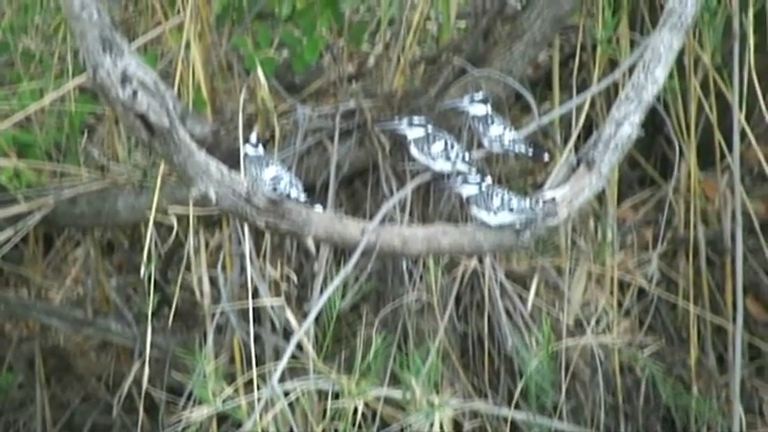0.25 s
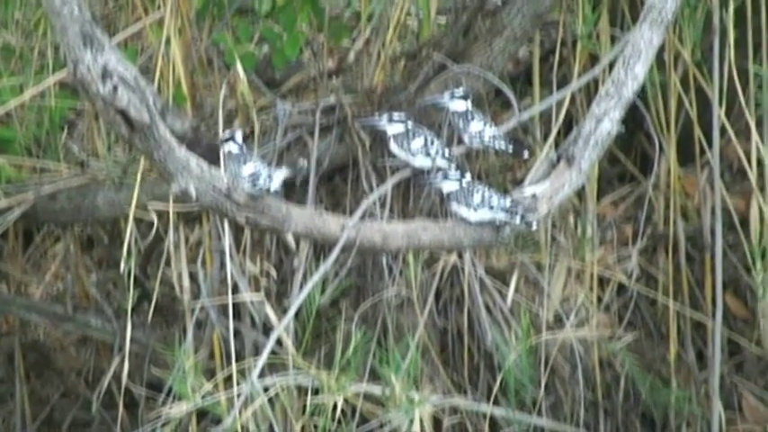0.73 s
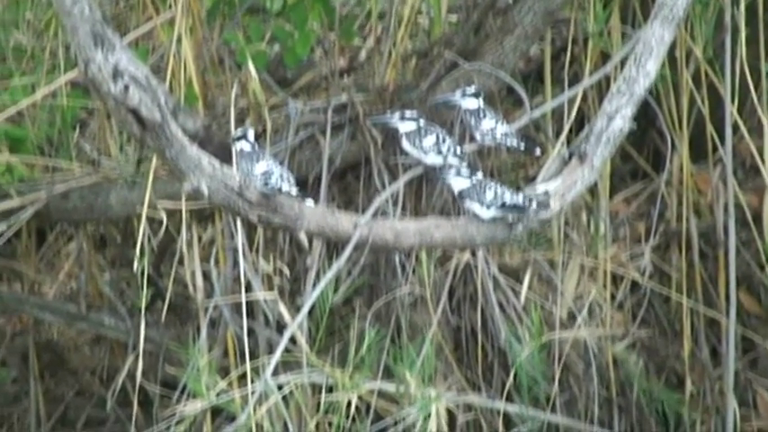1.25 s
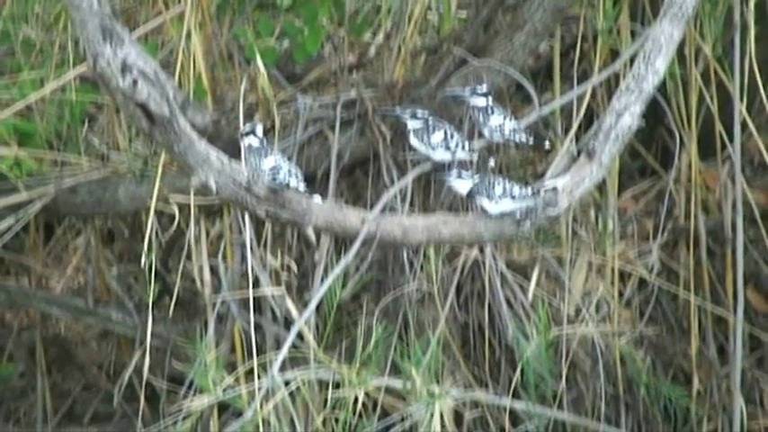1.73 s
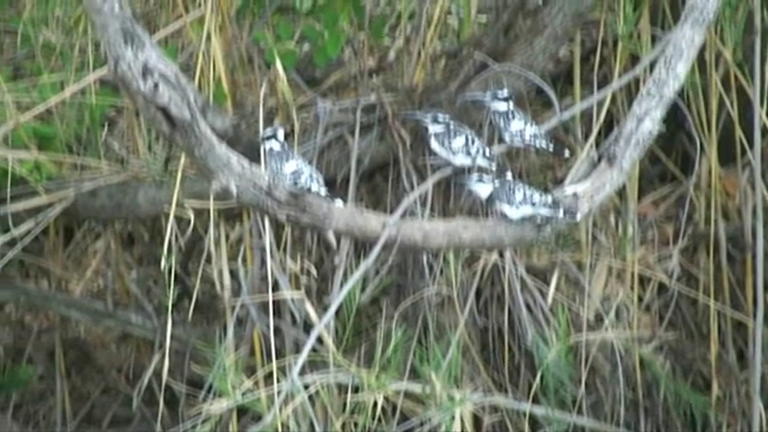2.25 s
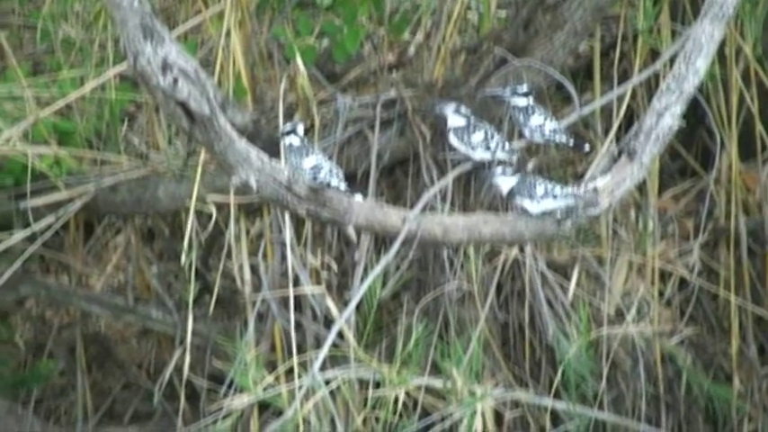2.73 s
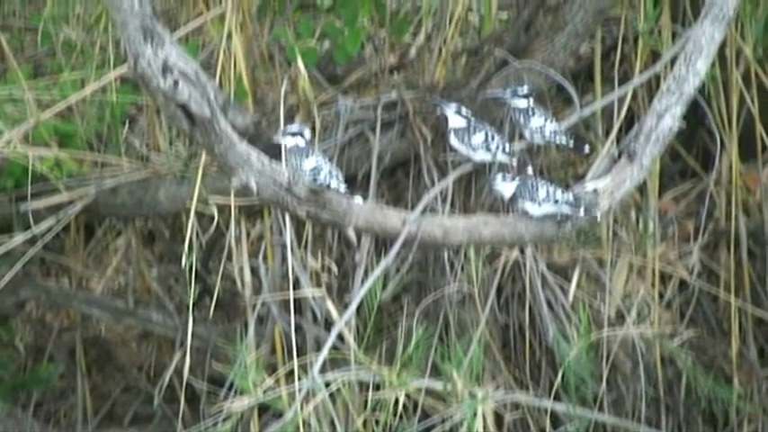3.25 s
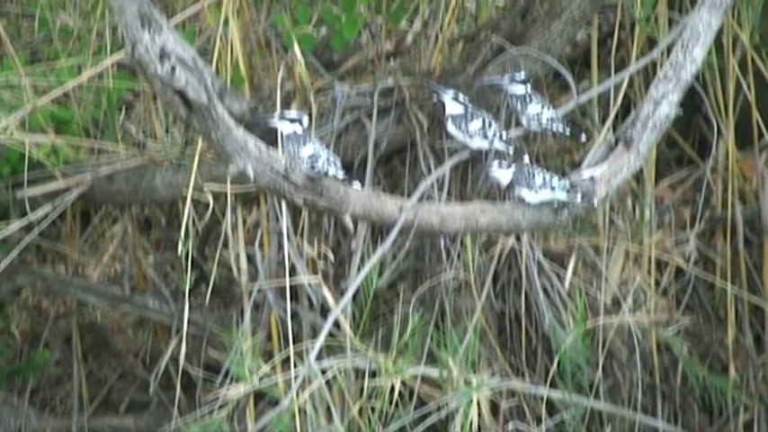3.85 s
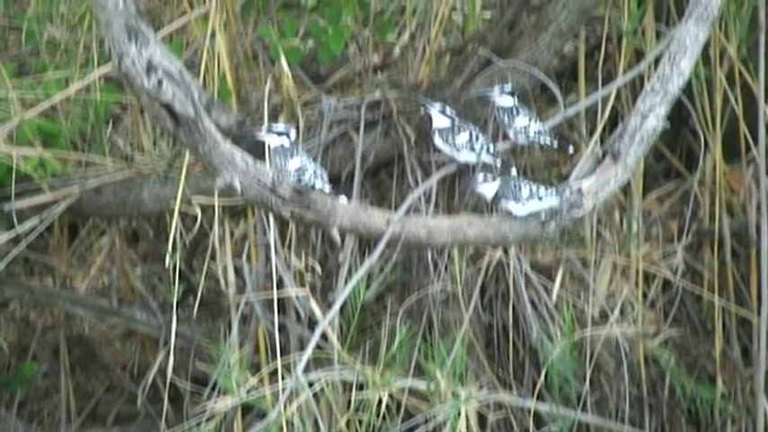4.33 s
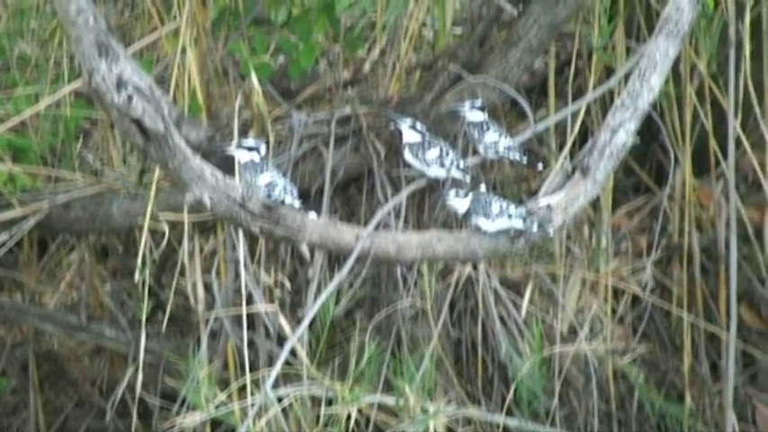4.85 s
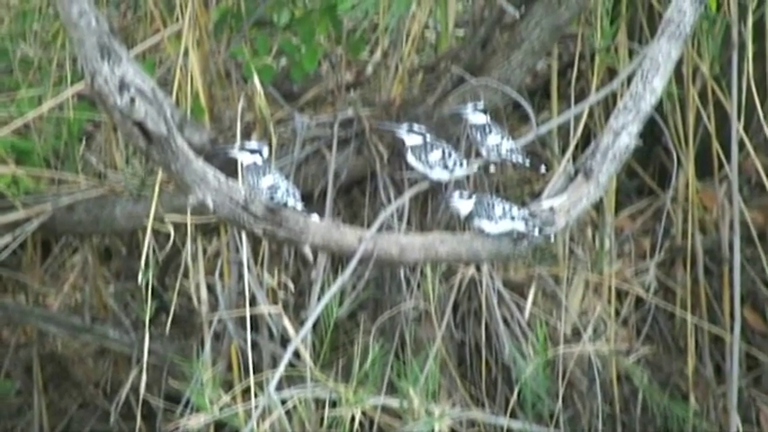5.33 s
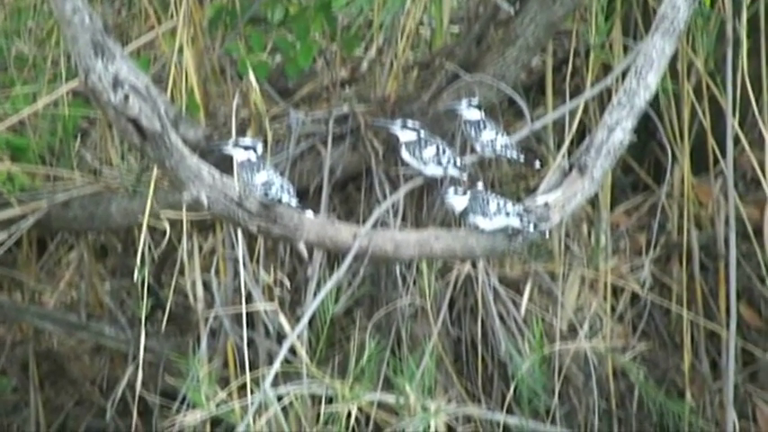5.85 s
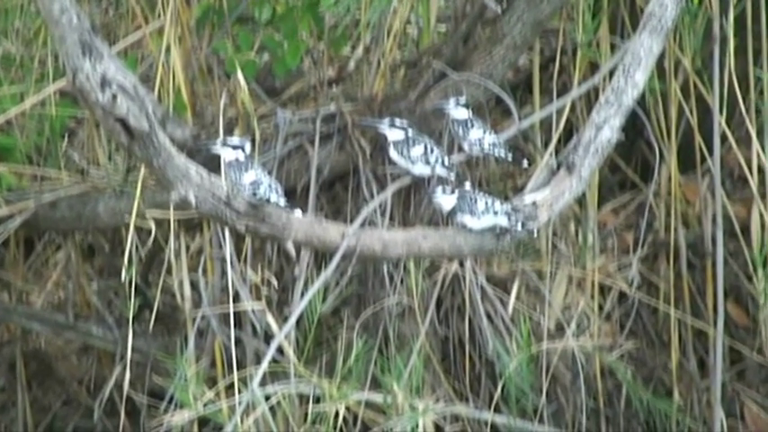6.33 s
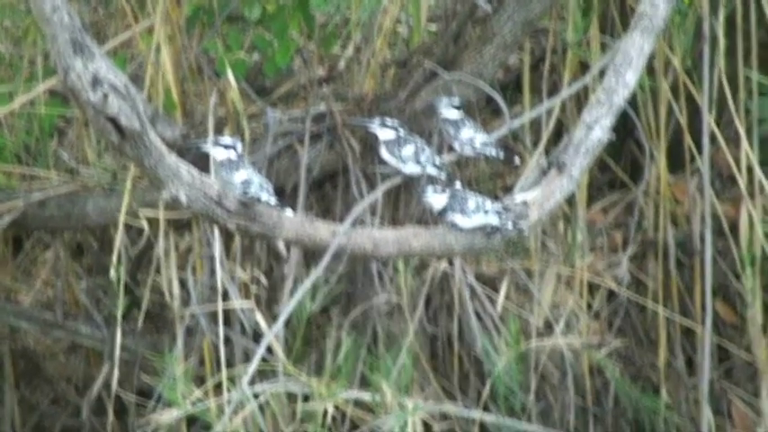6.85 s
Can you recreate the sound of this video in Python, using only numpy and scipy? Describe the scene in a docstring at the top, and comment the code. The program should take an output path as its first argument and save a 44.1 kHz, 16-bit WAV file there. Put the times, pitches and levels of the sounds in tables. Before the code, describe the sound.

A riverside open-air ambience: low steady rush, soft deep wind rumble on the microphone with a brief gust at the start, a barely audible distant hum and a faint high whine. At about 0.35 s one sharp, high kingfisher squeal rings out. Around 1.1 s a much softer squeal leads into faint peeps and ticks until 1.4 s. From 1.7 s the chatter builds: squeal, yip and a fast run of dry, descending ticks to 2.05 s, then louder bursts at 2.2-2.5, 2.7-3.1, 3.5-3.9 and 4.3-4.7 s, the last ones piercing, with a small peep among the final ticks. Each note is a thin, rapidly falling whistle with a short bank echo and airy ringing tail from the reeds. Calls then stop; two faint, farther chips sound near 5.4 and 6.1 s. Rush and gentle rumble continue to about 7 s.

```python
"""Pied kingfishers chatter on a branch over a river bank: most bursts are a squeal, a yip and a run of ticks.
Every note is a thin whistle with weak overtones, shaped by throat and beak; faint broadband noise rises and
falls with it. An echo comes off the bank and a ringing tail off the reeds; two faint chips come from farther
away. Behind them are the low rush of the valley, swells of rumble, wind on the microphone, a distant hum and a
faint high whine."""
import sys
import numpy as np
from scipy import signal
from scipy.fft import rfft, irfft, next_fast_len
from scipy.io import wavfile
from scipy.ndimage import uniform_filter1d, map_coordinates

SR = 44100
rng = np.random.default_rng(int(sys.argv[2]) if len(sys.argv) > 2 else 0)


def output_pcm(signal):
    """Save a mono or channel-first signal as 16-bit PCM at the path in sys.argv[1].

    Samples are clipped to [-1, 1] before scaling.
    """
    pcm = np.clip(np.atleast_2d(signal).T, -1, 1) * 32767
    wavfile.write(sys.argv[1], SR, np.round(pcm).astype(np.int16))


N = 312551

# what throat and beak pass: frequency_hz, gain_db
BEAK_GAIN = [(2400, -15), (3000, -13), (3600, -4.5), (4200, -2), (5000, -3.5), (6000, -10.5), (6900, -20),
             (8400, -13.5), (9800, -19), (11200, -18.5), (13000, -22), (16000, -27)]


def amp(db):
    """Decibels to gain."""
    return 10 ** (np.asarray(db) / 20)


def unit(x):
    """Scale to rms 1."""
    return x / np.sqrt(np.mean(x ** 2) + 1e-20)


def along(points, hz):
    """Read (Hz, value) points at hz, straight lines on a log frequency axis."""
    f, v = np.transpose(points)
    return np.interp(np.log(hz + 1), np.log(f + 1), v)


def wobble(rate, size=N):
    """A smooth random curve with rate knots a second."""
    knots = rng.standard_normal(int(size * rate / SR) + 4)
    return map_coordinates(knots, [np.arange(size) * rate / SR])


def filtered(x, response):
    """Multiply the spectrum of x by a response of frequency."""
    m = next_fast_len(N + SR // 2)
    return irfft(rfft(x, m) * response(np.fft.rfftfreq(m, 1 / SR)), m)[..., :N]


def add(track, s, sound):
    """Mix a stereo sound into the track at time s."""
    part = track[:, round(s * SR):][:, :sound.shape[1]]
    part += sound[:, :part.shape[1]]


def squeals():
    """Loud notes that open each burst and linger near the beak's main resonance."""
    # one squeal a row: plunge_start_s, lead_in_s, crest_hz, plunge_s, shelf_hz, hold_s, shelf_end_hz,
    # ledge_hz, linger_s, crest_effort_db, shelf_effort_db
    squeal_rows = [(0.3612, 0.0405, 6640, 0.0062, 4555, 0.016, 4550, 2960, 0.001, -9.5, -13),
                   (1.086, 0.00086, 6970, 0.0094, 3820, 0.023, 3770, 2500, 0.004, -31, -21),
                   (1.705, 0.0012, 7000, 0.01, 3950, 0.019, 3880, 2830, 0.01, -27, -14.5),
                   (2.197, 0.0064, 7150, 0.012, 4100, 0.014, 3900, 3080, 0.014, -10, -12),
                   (2.716, 0.007, 7250, 0.011, 4470, 0.019, 3950, 3360, 0.037, -8.5, -9.5),
                   (3.471, 0.0026, 7150, 0.0145, 4500, 0.02, 4030, 3560, 0.044, -11.5, -9),
                   (4.289, 0.0021, 7200, 0.0155, 4490, 0.022, 3940, 3550, 0.039, -10.5, -9.5)]
    track = np.zeros((2, N))
    for row in squeal_rows:
        s, note = squeal(row, overtone_db=-1.0)
        add(track, s, bank(note, wet_db=-7.0, echo_db=-11.0, build=0.0019))
    return track


def squeal(row, overtone_db, lift=1.04, droop=0.85, turn=0.58):
    """Start time and sound of a note that plunges to a bowed shelf, steps down to a soft ledge and droops."""
    s, lead, crest_hz, plunge, shelf_hz, hold, sag_hz, ledge_hz, linger, crest_db, shelf_db = row
    step_s, ledge_db = 0.011, -9.5  # the step from shelf to ledge and the effort lost on it
    turns = np.cumsum([0, plunge, hold, step_s, turn * linger, (1 - turn) * linger])
    t = np.arange(-lead, turns[-1], 1 / SR)
    rise_hz, rise_db = leap(t, crest_hz, crest_db, climb_db=14.5)
    pitch = np.interp(t, turns, [crest_hz, shelf_hz, sag_hz, ledge_hz, lift * ledge_hz, droop * ledge_hz])

    # a level shelf bows upwards by 171 Hz; sinking takes the bow away
    bow_hz = 171 - 0.414 * (shelf_hz - sag_hz)
    pitch = pitch + bow_hz * np.sin(np.pi * np.clip((t - plunge) / hold, 0, 1))
    pitch = uniform_filter1d(np.where(t < 0, rise_hz, pitch), size=130)  # the muscles round off each turn

    fall_db = np.interp(t, turns[:4], [crest_db, shelf_db, shelf_db, shelf_db + ledge_db])
    effort_db = np.where(t < 0, rise_db, fall_db)
    return s - lead, whistle(pitch, effort_db, overtone_db)


def leap(t, crest_hz, crest_db, climb_db, dome=0.06):
    """Pitch and effort before the plunge at t = 0: both climb, and the pitch arches over a short crest."""
    rest_hz, leap_s, crest_s = 2500, 0.0095, 0.008
    height = np.exp(np.minimum(t + crest_s, 0) / leap_s)
    arch = 1 + dome * np.sin(np.pi * np.clip(-t / crest_s, 0, 1))
    pitch = rest_hz + (crest_hz - rest_hz) * height * arch
    return pitch, crest_db - climb_db * (1 - height)


def yips(floor_hz=2830, glide_s=0.0106, crest_db=-7, attack_s=0.0035, hold_s=0.008, release_s=0.0061, tail_db=-10.0):
    """Each yip leaps to its crest, then glides down ever more slowly, pushed hard only at first."""
    # yips that answer the squeals: plunge_start_s, lead_in_s, crest_hz, length_after_s, effort_db
    yip_rows = [(1.798, 0.0012, 5750, 0.018, -17), (2.301, 0.01, 7200, 0.031, -10),
                (2.8512, 0.015, 7450, 0.032, -6.5), (3.599, 0.013, 7400, 0.036, -8),
                (4.4135, 0.012, 7400, 0.042, -7)]
    track = np.zeros((2, N))
    for s, lead, crest_hz, length, db in yip_rows:
        t = np.arange(-lead, length, 1 / SR)
        rise_hz, rise_db = leap(t, crest_hz, crest_db, climb_db=1)
        glide_hz = floor_hz + (crest_hz - floor_hz) * np.exp(-t / glide_s)
        pitch = np.where(t < 0, rise_hz, glide_hz)
        turns = np.cumsum([0, attack_s, hold_s, release_s])
        push_db = np.interp(t, turns, [crest_db, 0, 0, tail_db])
        force_db = np.where(t < 0, rise_db, push_db)
        note = whistle(pitch, db + force_db, overtone_db=0.5)
        add(track, s - lead, bank(note, wet_db=-6.5, echo_db=-11.5, build=0.0017))
    return track


def ticks(crest_width=0.00421, end_hz=2500, onset_db=-3, crest_db=-1, plunge_db=0.6, end_db=-5.5):
    """Each tick hooks over its crest and plunges to end_hz, strongest late in the fall."""
    # chatter ticks: crest_s, crest_hz, fall_s, effort_db
    tick_rows = [(1.2398, 5310, 0.014, -25), (1.286, 6270, 0.017, -24.5), (1.3351, 6270, 0.017, -24.7),
                 (1.3794, 6250, 0.017, -25), (1.8485, 5310, 0.0145, -21.5), (1.8929, 6630, 0.0172, -20),
                 (1.941, 6270, 0.0165, -19.8), (1.989, 6350, 0.015, -21.5), (2.0328, 6610, 0.016, -19.5),
                 (2.354, 4080, 0.0093, -22.5), (2.3874, 5340, 0.012, -18), (2.4259, 6180, 0.015, -17.7),
                 (2.467, 5520, 0.01, -20.2), (2.9002, 4070, 0.011, -16), (2.9341, 5700, 0.014, -14),
                 (2.974, 7040, 0.018, -14), (3.0193, 6670, 0.018, -14.5), (3.0627, 6680, 0.017, -16),
                 (3.706, 4410, 0.011, -16), (3.7442, 6640, 0.018, -14), (3.7922, 5880, 0.0152, -15.4),
                 (3.8348, 6470, 0.018, -15.5), (3.8803, 5530, 0.012, -17), (4.5793, 5930, 0.017, -10.5),
                 (4.6283, 5630, 0.013, -15.2), (4.6704, 6440, 0.018, -14.5), (4.7141, 4280, 0.011, -18)]
    # soft ticks climb longer to their crest: effort_db, lead_in_s
    hook = [(-22.5, 0.005), (-16.5, 0.001)]
    track = np.zeros((2, N))
    for s, crest_hz, fall, db in tick_rows:
        lead = np.interp(db, *np.transpose(hook))
        t = np.arange(-lead, fall, 1 / SR)
        drop = np.hypot(t, crest_width) - crest_width  # a rounded top between two nearly straight slopes
        pitch = crest_hz + (end_hz - crest_hz) * drop / drop[-1]
        force_db = np.interp(t, [-lead, 0, 0.76 * fall, fall], [onset_db, crest_db, plunge_db, end_db])
        note = whistle(pitch, db + force_db, overtone_db=-1.0)
        add(track, s - lead, bank(note, wet_db=-7, echo_db=-13.0, build=0.0026))
    return track


def peeps(arch_hz=900, ends_db=-14):
    """Pitch and effort rise and fall together in one small arch."""
    # arched peeps: top_s, top_hz, half_length_s, effort_db
    peep_rows = [(1.193, 4930, 0.02, -37), (1.228, 4360, 0.015, -31), (4.551, 4830, 0.0087, -11)]
    track = np.zeros((2, N))
    for s, top_hz, half, db in peep_rows:
        bend = np.linspace(-1, 1, round(2 * half * SR)) ** 2
        note = whistle(top_hz - arch_hz * bend, db + ends_db * bend, overtone_db=1.0)
        add(track, s - half, bank(note, wet_db=-11, echo_db=-8, build=0.0025))
    return track


def chips():
    """Faint notes from farther off, squeals in form, with a strong tail from the reeds."""
    # one chip a row: plunge_start_s, lead_in_s, crest_hz, plunge_s, shelf_hz, hold_s, shelf_end_hz,
    # ledge_hz, linger_s, crest_effort_db, shelf_effort_db (efforts before a common lift)
    chip_rows = [(5.431, 0.013, 7100, 0.006, 4380, 0.0075, 4260, 4230, 0.001, -26, -33),
                 (6.068, 0.02, 6580, 0.0064, 4970, 0.0085, 4930, 4500, 0.001, -29.5, -33)]
    # for each chip: overtone_db, reed_tail_db
    chip_tone = [(16.5, -3), (-10, -3)]
    track = np.zeros((2, N))
    for row, (overtone_db, wet_db) in zip(chip_rows, chip_tone):
        s, note = squeal(row, overtone_db)
        add(track, s, amp(1.5) * bank(note, wet_db, echo_db=-10, build=0.057))
    return filtered(track, lambda hz: amp(along([(9000, 0), (13000, -22)], hz)))  # distance dulls the top


def whistle(pitch, effort_db, overtone_db, third_db=-9, brightening=0.47, firm_db=-14, flutter_db=1.0, edge=0.00024):
    """The syrinx sings a tone with two overtones; each swells as it slides through a beak resonance."""
    # richest in mid range, nearly pure at the top: pitch_hz, relative_overtone_db
    richness = [(2800, -3), (3400, 0), (4200, -4), (5200, -7), (6000, -12.5), (7200, -19)]
    t = np.arange(len(pitch)) / SR
    pitch = pitch * (1 + .005 * wobble(600, size=len(t)))
    phase = 2 * np.pi * np.cumsum(pitch) / SR

    push_db = brightening * (effort_db - firm_db)  # harder blowing gives richer overtones
    second_db = overtone_db + along(richness, pitch) + push_db
    levels_db = [0, second_db, second_db + third_db + push_db]
    tone = 0
    for k, db in enumerate(levels_db, 1):
        below_nyquist = k * pitch < SR / 2
        tone = tone + amp(db + along(BEAK_GAIN, k * pitch)) * below_nyquist * np.sin(k * phase)

    gate = np.clip(np.minimum(t, t[-1] - t) / edge, 0, 1)  # edge: fade in s at both ends
    loudness = amp(effort_db + flutter_db * wobble(372, size=len(t)))
    return (tone + note_noise(pitch)) * gate * loudness


def note_noise(pitch, noise_db=-32):
    """Faint broadband noise that rises and falls with each note's level, strongest where the tone rings best."""
    # colour of the noise: frequency_hz, relative_level_db
    noise_colour = [(1500, -3), (3000, 0), (6000, 2), (9000, 6), (11000, -7), (14000, -11), (16000, -20)]
    size = len(pitch)
    colour = amp(along(noise_colour, np.fft.rfftfreq(size, 1 / SR)))
    coloured = irfft(rfft(rng.standard_normal(size)) * colour, size)
    return unit(coloured) * amp(noise_db + along(BEAK_GAIN, pitch) / 2)


def bank(note, wet_db, echo_db, build, echo_delay=0.023, echo_spread=0.017, width=0.39):
    """The direct note, a blurred echo off the bank and a tail scattered by the reeds (times in s)."""
    # ring of the reed bank: frequency_hz, t60_s
    reed_ring = [(2500, 0.41), (4300, 0.3), (8000, 0.49), (14000, 0.33)]
    hz, t, z = signal.stft(rng.standard_normal((2, SR // 2)), SR, nperseg=256)
    decay = amp(-60 * t / along(reed_ring, hz)[:, None])
    tail = signal.istft(z * decay, SR, nperseg=256)[1]
    t = np.arange(tail.shape[1]) / SR
    tail = tail * (1 - np.exp(-t / build))
    echo = rng.standard_normal(tail.shape) * np.exp(-((t - echo_delay) / echo_spread) ** 2)

    tail = amp(wet_db) * tail / np.linalg.norm(tail[0])
    echo = amp(echo_db) * echo / np.linalg.norm(echo[0])
    mid, side = tail + echo
    mid = mid + (t == 0)  # the direct note
    return signal.fftconvolve(note[None], np.array([mid + width * side, mid - width * side]), axes=1)


def background():
    """The river valley behind the birds: rush, swells, wind, hum and whine."""
    return rush() + swells() + wind() + hum() + whine()


def rush(rush_db=-39.5):
    """Even outdoor rush: steady coloured noise, wider at the top than in the bass."""
    # colour of the rush: frequency_hz, relative_db_per_hz
    rush_colour = [(20, 2), (80, -0.5), (160, -2.5), (260, -7.5), (520, -4.5), (850, -8.5), (1200, -12),
                   (2000, -17.5), (2900, -21), (4500, -22.5), (6300, -25.5), (9500, -35), (14400, -47.5),
                   (15600, -50)]
    # left-right likeness of the rush: frequency_hz, coherence
    likeness = [(60, 1), (150, 1), (380, 0.83), (950, 0.55), (2380, 0.57), (5980, 0.4), (15000, 0.61)]
    return amp(rush_db) * noise(rush_colour, likeness)


def swells(swell_db=-3):
    """A low rumble that swells and fades, alike on both sides."""
    # swells: peak_s, relative_level_db, fade_s
    swell_rows = [(0.06, -35, 0.061), (0.58, -48, 0.1), (2.58, -45, 0.15), (3.18, -41, 0.3),
                  (3.85, -36, 0.33), (4.65, -40, 0.68), (5.26, -37, 0.19), (6.75, -44, 0.9)]
    # colour of the swells: frequency_hz, relative_db_per_hz
    swell_colour = [(50, -37), (110, -4), (165, -0.5), (220, -9), (320, -12), (1000, -51)]
    gain = amp(swell_db) * surges(swell_rows, calm_db=-51.5, rise_s=0.096)
    return gain * noise(swell_colour, [(160, 1.0)])


def wind(wind_db=-1.0):
    """Gusts on the microphone: deep rumble, almost unrelated left and right, a little stronger on the right."""
    # gusts: peak_s, relative_level_db, fade_s
    gust_rows = [(0.05, -23, 0.08), (0.42, -34, 0.26), (0.57, -31.5, 0.16), (0.92, -29.5, 0.12),
                 (1.17, -36, 0.27), (1.68, -37.5, 0.06), (1.88, -36, 0.29), (2.87, -33.5, 0.31),
                 (3.2, -35.5, 0.85), (4.07, -33.5, 0.14), (4.4, -36.5, 0.1), (4.85, -45, 0.1),
                 (6.52, -39, 0.14), (7.05, -39, 0.087)]
    # colour of the wind: frequency_hz, relative_db_per_hz
    wind_colour = [(12, -14), (25, -1), (48, 0.5), (80, -3.5), (140, -12), (250, -23), (600, -48),
                   (2000, -100)]
    gain = amp(wind_db + 1.7 * wobble(7.5)) * surges(gust_rows, calm_db=-54.5, rise_s=0.074)
    return gain * noise(wind_colour, [(50, 0.14)]) * amp([[-1.4], [1.4]])


def hum():
    """A distant hum of two slowly wandering tones, a little stronger on the right."""
    # hum tones: frequency_hz, level_db (rms, before the lean to the right)
    hum_lines = [(597, -47), (765, -56)]
    return tones(hum_lines, rate=16, drift_hz=4.2, waver_db=2, skew=0.91) * amp([[-1.5], [1.5]])


def whine():
    """A faint high whine of tones that waver quickly."""
    # whine tones: frequency_hz, level_db (rms)
    whine_lines = [(5400, -67.5), (5916, -78), (6218, -66), (6374, -81), (10800, -81)]
    return tones(whine_lines, rate=130, drift_hz=24.4, waver_db=-5.0, skew=0.37)


def tones(lines, rate, drift_hz, waver_db, skew):
    """Lasting tones that wander in pitch and level and reach the two sides skew radians apart."""
    total = np.zeros((2, N))
    for hz, db in lines:
        phase = 2 * np.pi * np.cumsum(hz + drift_hz * wobble(rate)) / SR
        tone = amp(waver_db * wobble(rate)) * np.sin([phase, phase + skew])
        total += amp(db) * unit(tone)
    return total


def surges(rows, calm_db, rise_s):
    """Gain of a flow that is calm except for surges, each rising fast and fading at its own pace."""
    t = np.arange(N) / SR
    each = [amp(db) * np.exp(-np.maximum((s - t) / rise_s, (t - s) / fade)) for s, db, fade in rows]
    return np.sqrt(amp(calm_db) ** 2 + np.sum(np.square(each), axis=0))


def noise(spectrum, alike):
    """Coloured stereo noise of rms 1; the split into mid and side sets the left-right coherence."""
    def mid_side(hz):
        angle = np.arccos(np.clip(along(alike, hz), -1, 1)) / 2
        return amp(along(spectrum, hz)) * [np.cos(angle), np.sin(angle)]

    mid, side = filtered(rng.standard_normal((2, N)), mid_side)
    return unit(np.array([mid + side, mid - side]))


def scene():
    """The birds sit a little to the right, with a lean that varies with frequency, before the background."""
    lean = [(3000, 1.6), (6000, 1.2), (8500, -0.65), (13000, .1)]  # (Hz, dB up on the right and down on the left)
    calls = squeals() + yips() + peeps() + ticks() + chips()
    birds = filtered(calls, lambda hz: amp([-along(lean, hz), along(lean, hz)]))
    return birds + background()


def record(dry, top_hz=15600):
    """The recorder keeps nothing above its band limit."""
    return filtered(dry, lambda hz: hz < top_hz)


dry = scene()
out = record(dry)
output_pcm(out)
```